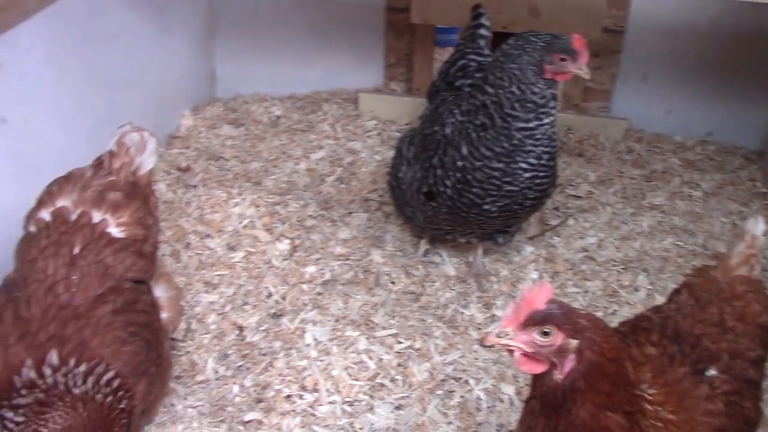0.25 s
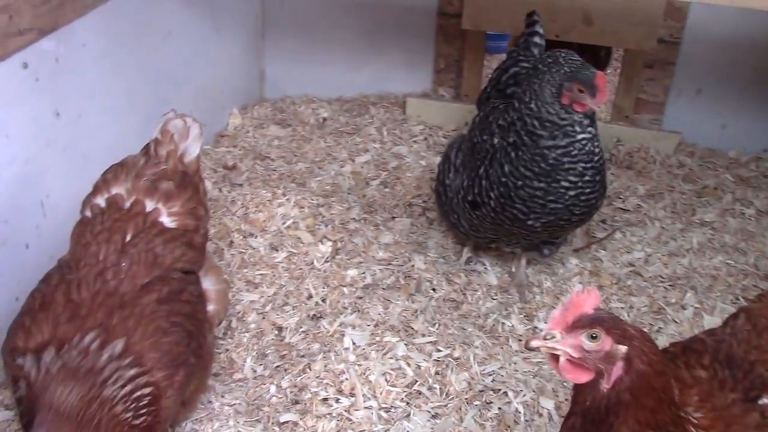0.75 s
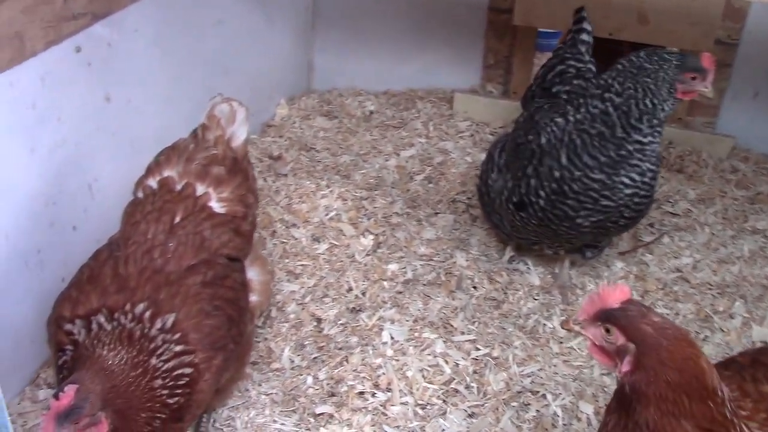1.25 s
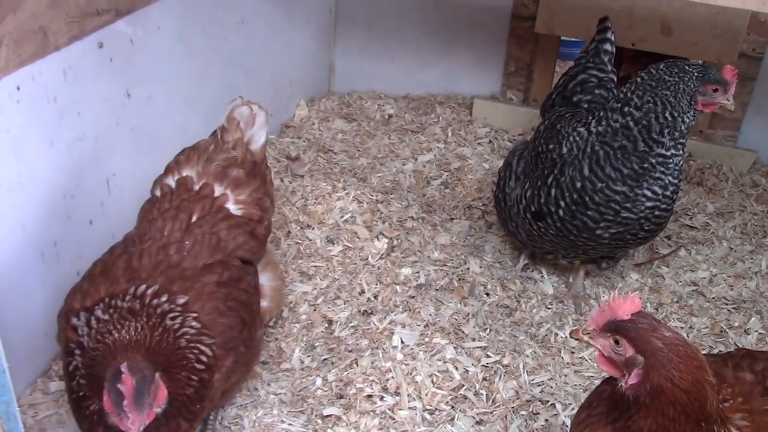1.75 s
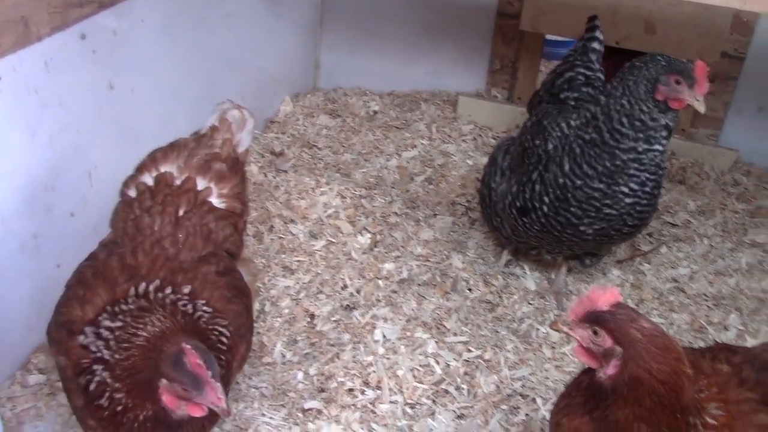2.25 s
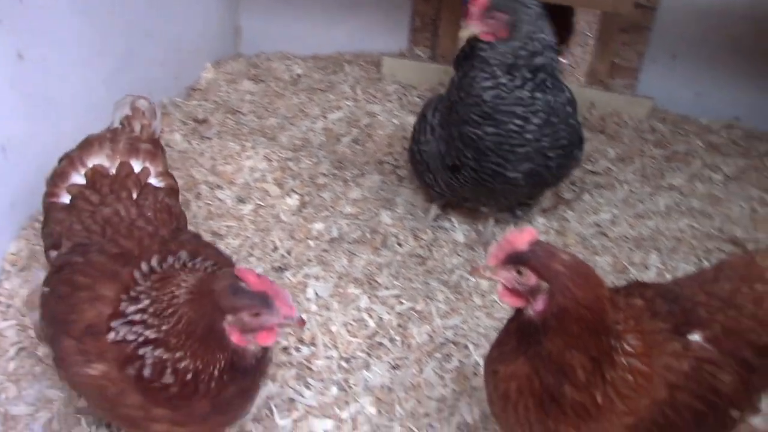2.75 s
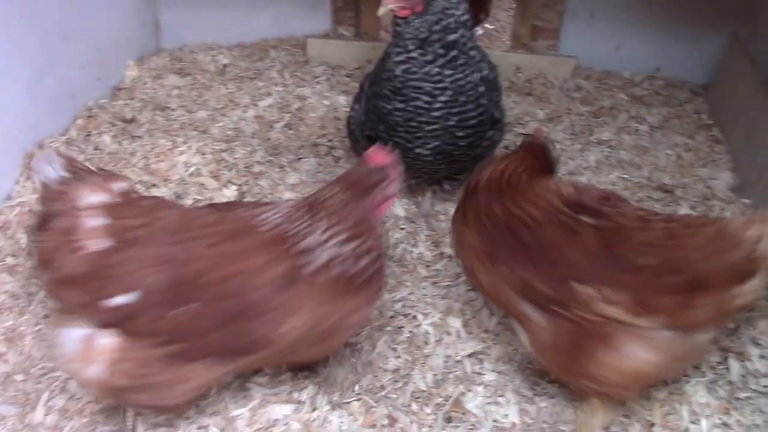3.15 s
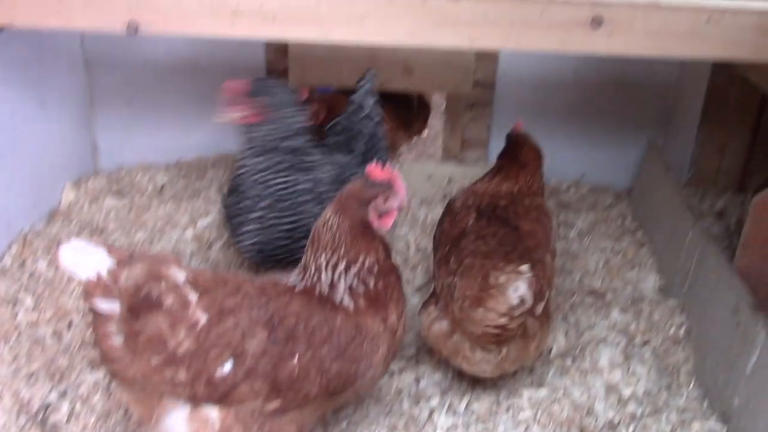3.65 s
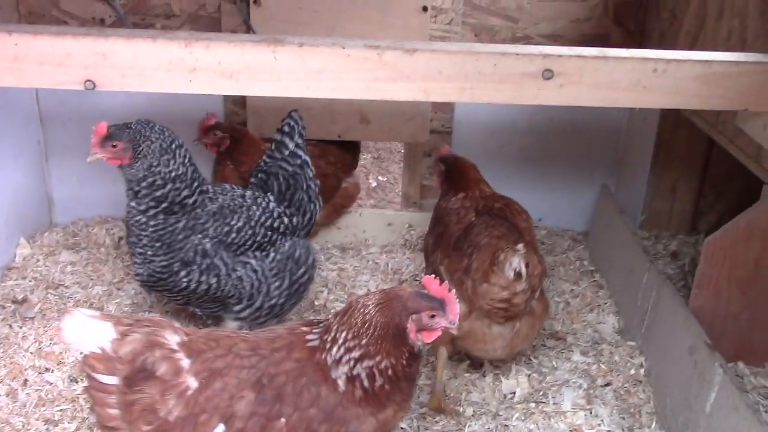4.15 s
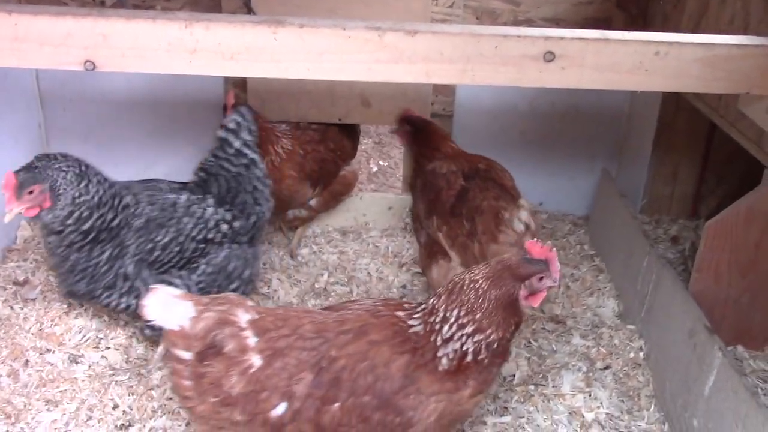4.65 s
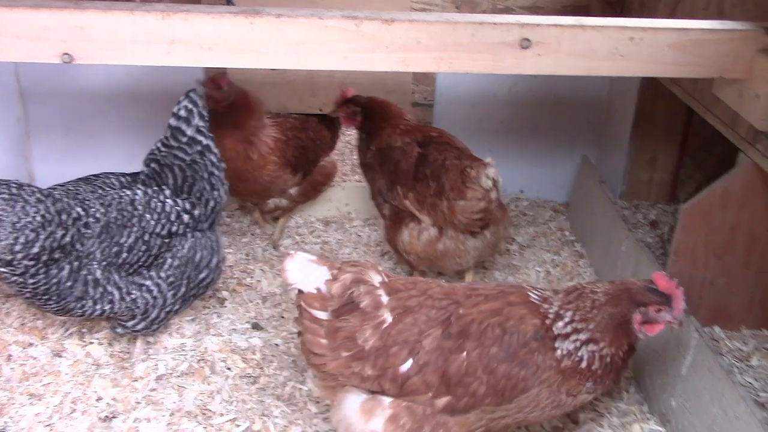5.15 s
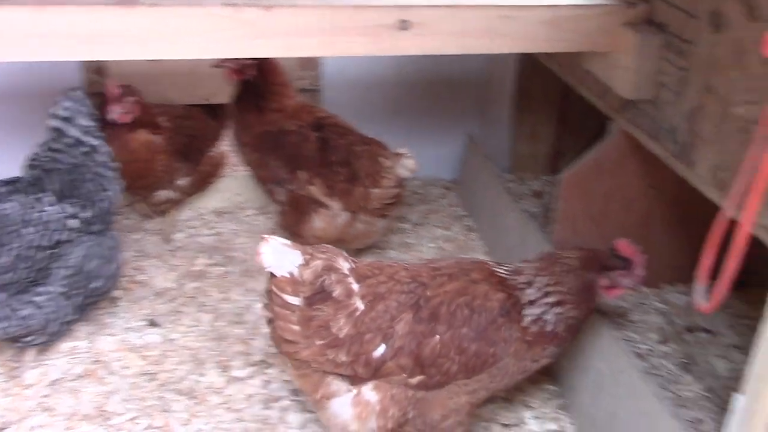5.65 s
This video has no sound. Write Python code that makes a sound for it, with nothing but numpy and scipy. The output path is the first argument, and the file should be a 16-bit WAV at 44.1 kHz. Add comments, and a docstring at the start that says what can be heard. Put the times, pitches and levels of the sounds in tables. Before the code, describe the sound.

Hens cluck in short rising runs, squawk harshly and give long clear calls while shuffling through wood shavings in a small coop.

```python
"""Hens in a wooden coop

Inside a small coop, stereo microphone close to the birds. One hen clucks in runs of short rising notes;
another answers with harsh squawks from an overblown syrinx, later with long, clear whistling notes.
Feet shuffle through wood shavings and knock the floor, beaks and claws tap on wood, feathers rustle.
The walls give a short ring over a low murmur of outdoor air."""
import sys
import numpy as np
from scipy import signal
from scipy.fft import rfft, irfft, next_fast_len
from scipy.io import wavfile
from scipy.ndimage import uniform_filter1d, map_coordinates

SR = 44100
rng = np.random.default_rng(int(sys.argv[2]) if len(sys.argv) > 2 else 0)


def transcribe(u):
    """Save the signal u as a 16-bit wav file named by the first command-line argument.

    u: samples, shape (n,) or (channels, n), limited to [-1, 1]; the rate is SR.
    q: integer samples, one column per channel.
    """
    v = np.clip(np.atleast_2d(u).T, -1, 1)
    q = np.round(v * 32767).astype(np.int16)
    wavfile.write(sys.argv[1], SR, q)


N = 260181
IMPACT_S = np.arange(SR // 5) / SR  # time axis of one knock, tap or snap


def amp(db):
    return 10 ** (np.asarray(db) / 20)


def unit_rms(x):
    return x / np.sqrt(np.mean(x ** 2) + 1e-20)


def along(points, hz):
    """Interpolate (freq_hz, value) points on a log frequency axis."""
    freqs, values = np.transpose(points)
    return np.interp(np.log(hz + 1), np.log(freqs + 1), values)


def stretch(rows, fade_s):
    """Sample span, soft-edged window and per-sample columns of rows that begin with a time."""
    times, *columns = np.transpose(rows)
    start, end_s = int(times[0] * SR), times[-1] + fade_s
    t = np.arange(start, min(N, int(end_s * SR))) / SR
    edge = np.clip(np.minimum(t - times[0], end_s - t) / fade_s, 0, 1)
    return slice(start, start + len(t)), edge, [np.interp(t, times, c) for c in columns]


def wobble(rate_hz):
    """A smooth random curve with rate_hz knots a second."""
    return map_coordinates(rng.standard_normal(N // 20), [np.arange(N) * rate_hz / SR])


def filtered(x, response):
    """Pass x through a complex response of frequency."""
    size = next_fast_len(N + SR // 2)
    return irfft(rfft(x, size) * response(np.fft.rfftfreq(size, 1 / SR)), size)[..., :N]


def coloured(x, spectrum, tilt_db_per_octave=0):
    """Shape x by (freq_hz, level_db) points, tilted about 7 kHz."""
    return filtered(x, lambda f: amp(along(spectrum, f) + tilt_db_per_octave * np.log2(f / 7000 + .01)))


def resonance(f, hz, width_hz):
    """Response of two like band-pass resonators in series."""
    return (1j * f * width_hz / (hz * hz - f * f + 1j * f * width_hz)) ** 2


def impact(out, start_s, db, hz, t60_s, attack_s, relative_width, hold_s=0):
    """Add to out a puff of noise around one pitch that dies away after hold_s."""
    t = IMPACT_S
    response = resonance(np.fft.rfftfreq(len(t), 1 / SR), hz, relative_width * hz)
    puff = unit_rms(irfft(rfft(rng.standard_normal(len(t))) * response, len(t)))
    decay = amp(db - 60 * np.maximum(t - hold_s, 0) / t60_s)
    out[round(start_s * SR):][:len(t)] += decay * (1 - np.exp(-t / attack_s)) * puff


def outdoor_air():
    """A soft low murmur from outside, gently uneven, as mid and side."""
    # colour of the murmur: freq_hz, level_db
    spectrum = [(25, -49), (90, -20.5), (125, -10), (220, 0), (400, -5.5), (800, -8), (1300, -14),
                (2000, -22.5), (3000, -27.5), (6000, -34), (10000, -43), (15600, -68)]
    # its slow rise and fall: time_s, level_db
    levels = [(0, -57), (2, -58), (3, -55), (3.7, -55.5), (5.9, -55)]
    times, db = np.transpose(levels)
    murmur = coloured(rng.standard_normal((2, N)) * amp(wobble(7.4)), spectrum)
    return amp(np.interp(np.arange(N) / SR, times, db)) * murmur / np.std(murmur)


def syrinx(calls, jitter, shimmer_db, breath_db, rough, strain):
    """The syrinx swings with a few harmonics, unsteady and breathy, ragged where the pitch moves fast."""
    # air past the syrinx: freq_hz, level_db
    breath_spectrum = [(150, -42.5), (300, -7.5), (600, 0.5), (1000, -11), (1600, -9), (2200, -24.5),
                       (3200, -50), (5000, -73.5)]
    out, phase = np.zeros(N), np.zeros(N)
    drift, flutter, swells = wobble(90), wobble(350), [wobble(45) for _ in range(6)]
    breath = unit_rms(coloured(rng.standard_normal(N), breath_spectrum))
    for rows in calls:
        span, edge, (hz, *levels) = stretch(rows, fade_s=.0034)
        glide = np.abs(uniform_filter1d(np.gradient(np.log(hz)), size=600)) * SR  # log pitch a second
        step = 2 * np.pi * hz * (1 + jitter * drift[span]) / SR
        phase[span] = phase[span.start] + np.cumsum(step)  # a joined note carries on the swing
        ragged = 1 + np.clip(rough + strain * glide, 0, 1) * flutter[span]
        for k, db in enumerate(levels, 1):
            peak = np.sqrt(2) * amp(db + shimmer_db * swells[k - 1][span])
            out[span] += edge * ragged * peak * np.sin(k * phase[span])
        out[span] += edge * amp(np.maximum(levels[0], levels[1]) + breath_db) * breath[span]
    return out


def clucks():
    """Two runs of short notes from the syrinx, most ending on a rise."""
    # one list a cluck or part of one: time_s, pitch_hz, harmonic1_db to harmonic3_db
    calls = [
        [(0.082, 589, -35.5, -62, -85.5), (0.098, 532, -26, -39.5, -77), (0.114, 524, -25, -33, -66.5),
         (0.13, 647, -27, -34.5, -76.5)],
        [(0.13, 683, -17.5, -26, -67), (0.14, 758, -27, -47, -60), (0.152, 913, -31.5, -49, -92),
         (0.168, 969, -32, -63, -96)],
        [(0.297, 558, -34.5, -64.5, -84.5), (0.317, 530, -25.5, -42, -61), (0.325, 601, -25.5, -56.5, -79),
         (0.33, 649, -31, -26.5, -48)],
        [(0.33, 605, -41, -40, -53), (0.34, 671, -19.5, -49, -64), (0.348, 836, -30.5, -42.5, -77),
         (0.356, 967, -37, -54, -91)],
        [(0.474, 660, -29.5, -63, -82), (0.48, 614, -34.5, -45, -83), (0.5, 541.5, -22.5, -31.5, -66),
         (0.52, 620, -29.5, -35, -50)],
        [(0.52, 599, -39, -36.5, -49), (0.526, 611, -29, -30.5, -44), (0.53, 629, -22, -32, -68),
         (0.554, 877, -34.5, -66, -89)],
        [(0.685, 625, -34, -75, -84), (0.695, 575.6, -33, -40.5, -58), (0.711, 539.6, -22, -48, -47),
         (0.725, 565, -23, -41, -43.5)],
        [(0.725, 562, -32, -30, -45.5), (0.753, 690, -21.5, -43.5, -62), (0.763, 726, -37, -46, -92.5),
         (0.765, 724.2, -38, -52, -75)],
        [(0.905, 606, -42, -49, -59), (0.929, 571, -32, -33, -63), (0.941, 516, -24, -38, -47),
         (0.97, 579, -34.5, -47, -44)],
        [(1.28, 536, -53, -29, -45), (1.292, 545.3, -34, -31, -44), (1.304, 568.3, -34, -43, -51),
         (1.338, 586.6, -30, -41, -46), (1.37, 552.8, -34.5, -40, -28.5)],
        [(1.37, 555, -27, -38.5, -41), (1.408, 582, -34.5, -44, -42.5), (1.428, 540, -31, -39.5, -66),
         (1.45, 632.4, -25.5, -38, -64.5), (1.46, 563, -36, -43.5, -76)],
        [(1.46, 562, -26.5, -38, -63), (1.468, 549.7, -44, -36.5, -67), (1.538, 545.6, -33, -32.5, -59),
         (1.58, 589.4, -26.5, -41.5, -51), (1.6, 629, -23, -34, -52)],
        [(1.6, 647, -48, -34, -64), (1.608, 642, -34, -37, -57), (1.62, 691, -25.5, -41.5, -63),
         (1.662, 774, -17.5, -37, -63), (1.685, 845, -57, -30.5, -73)],
        [(1.79, 594, -55, -27, -58), (1.804, 613.5, -27, -60, -39), (1.822, 556, -26, -27, -35),
         (1.84, 584.3, -27, -44, -60), (1.87, 623, -50, -34.5, -67)],
        [(4.474, 584, -40.5, -72.5, -65), (4.49, 525, -29, -40, -71.5), (4.51, 539, -23, -46, -47),
         (4.52, 534, -27, -29.5, -53)],
        [(4.52, 530, -26.5, -41.5, -61), (4.538, 679, -34, -41, -73), (4.56, 760, -38, -56.5, -84)],
        [(4.664, 566, -34.5, -41.5, -77), (4.678, 543.3, -24.5, -49, -77), (4.702, 554.3, -22, -31.5, -68.5),
         (4.726, 772, -26, -34.5, -76.5), (4.74, 899, -22, -53, -75)],
        [(4.87, 648, -29.5, -47, -82), (4.88, 635, -36.5, -57, -81), (4.896, 596, -28.5, -33.5, -57.5),
         (4.91, 641, -31.5, -33, -66.5)],
        [(4.91, 629, -32, -34, -69.5), (4.934, 696, -23, -40.5, -85), (4.944, 735, -25.5, -45, -86.5),
         (4.955, 800, -28.5, -54, -85.5)],
        [(5.075, 628, -33.5, -59.5, -68), (5.089, 585, -31.5, -40, -63), (5.103, 567, -34, -34.5, -51),
         (5.115, 586, -27.5, -42, -48)],
        [(5.115, 606, -27.5, -42, -54), (5.125, 637, -31, -30, -64), (5.149, 670, -33.5, -44.5, -87.5),
         (5.16, 698, -35, -46, -77)],
        [(5.282, 580, -55, -53, -70), (5.29, 625.5, -41, -31, -55), (5.314, 662, -32.5, -39.5, -46.5),
         (5.332, 662, -42, -31, -76), (5.36, 640, -57.5, -59, -71)],
    ]
    return syrinx(calls, jitter=.012, shimmer_db=1.5, breath_db=-25, rough=.06, strain=.015)


def hoarse_notes():
    """A ragged swing of the syrinx leads into the first squawk and carries it."""
    # one list a note or part of one: time_s, pitch_hz, harmonic1_db to harmonic3_db
    calls = [
        [(0.66, 742, -59, -75, -89), (0.68, 751, -38.5, -67, -100), (0.72, 864, -36.5, -50, -87),
         (0.754, 774, -38, -53, -88), (0.8, 881, -41, -39.5, -92)],
        [(0.8, 900, -48.5, -59, -91), (0.82, 947, -32, -56, -83), (0.848, 892, -39.5, -55, -88),
         (0.864, 837, -37, -41, -100), (0.9, 817, -42, -46, -81.5)],
        [(0.97, 480, -43, -54, -38.5), (0.988, 476.2, -35.5, -32, -44), (1.004, 467.7, -45, -37, -53),
         (1.016, 474, -43, -37, -48), (1.106, 459.8, -40, -42, -37.5), (1.186, 451.5, -54, -36.5, -44),
         (1.242, 448, -49, -42, -38), (1.26, 486, -27.5, -28, -43)],
    ]
    return syrinx(calls, jitter=.027, shimmer_db=-1, breath_db=-23, rough=.25, strain=.055)


def tract(drive, modes, scale):
    """Ring resonances of alternating polarity, their frequencies multiplied by scale."""
    return filtered(drive, lambda f: sum((-1) ** k * amp(db) * resonance(f, hz * scale, width_hz)
                                         for k, (hz, width_hz, db) in enumerate(modes)))


def squawks():
    """The syrinx is overblown: uneven pulses and turbulent air ring the throat and the beak."""
    # one list a squawk: time_s, level_db, rasp_db, pulse_rate_hz, noise_share
    calls = [
        [(0.8, -41, -43.5, 230.3, 0.58), (0.808, -43, -31, 234.1, 0.58), (0.826, -52, -27.5, 231.1, 0.58),
         (0.844, -44.5, -41, 232.6, 0.58), (0.948, -29, -37, 233, 0.58), (0.958, -32, -32, 232.6, 0.58),
         (1.136, -35, -25, 233.9, 0.58), (1.284, -29.5, -32.5, 233, 0.58), (1.33, -28, -27, 233, 0.58),
         (1.378, -26, -36, 229, 0.58), (1.402, -28.5, -29, 236.5, 0.58), (1.41, -30, -41, 233, 0.58),
         (1.45, -53, -42, 229, 0.58)],
        [(1.54, -35.5, -43, 233.9, 0.58), (1.828, -27, -29, 231.3, 0.58), (1.852, -36, -31, 231, 0.58),
         (1.86, -30, -45, 228.3, 0.58), (1.89, -74, -29, 234.5, 0.58)],
    ]
    # resonances of the open throat: freq_hz, width_hz, level_db
    throat_modes = [(468, 350, -14), (802, 188, -6.5), (1008, 98, -2.5), (1124, 170, -5), (1398, 476, -5.5),
                    (1583, 440, -7.5), (2083, 205, -20)]
    # resonances of beak and mouth: freq_hz, width_hz, level_db
    beak_modes = [(3695, 270, 6.5), (4290, 290, -9), (5660, 500, -20.5), (6760, 890, -26.5),
                  (8500, 580, -17.5), (10220, 500, -19.5)]
    # resonance scale of each squawk; the second comes from a shorter throat
    scales = [1, 1.058]
    out = np.zeros(N)
    for rows, scale in zip(calls, scales):
        drift, sizes, gusts, noise = wobble(40), wobble(120), wobble(150), rng.standard_normal(N)
        span, edge, (db, rasp_db, hz, noise_share) = stretch(rows, fade_s=.013)
        cycles = np.cumsum(hz * (1 + .035 * drift[span])) / SR
        pulses = np.diff(np.floor(cycles), prepend=0) * np.sqrt(SR / hz) * amp(1.5 * sizes[span])
        turbulence = noise[span] * amp(2.2 * gusts[span])
        drive = np.zeros(N)
        drive[span] = np.sqrt(1 - noise_share) * pulses + np.sqrt(noise_share) * turbulence
        body = unit_rms(tract(drive, throat_modes, scale)[span])
        rasp = unit_rms(tract(drive, beak_modes, scale)[span])
        out[span] += edge * amp(db) * (body + amp(rasp_db) * rasp)
    return out


def shuffle():
    """Shavings slide underfoot as a patchy hiss with small crackles."""
    # one list a movement: time_s, level_db, brightness (under 0 dull, over 0 bright)
    movements = [
        [(0.95, -81, 0), (0.974, -75, 0.5), (0.982, -66.5, 7), (1.064, -86, -7), (1.136, -75, 0),
         (1.148, -62.5, 1), (1.232, -54.5, 1), (1.258, -62, 0), (1.314, -46.5, 0), (1.44, -70, 0),
         (1.45, -74, 1)],
        [(2.25, -90, 0), (2.282, -59, 0), (2.3, -72.5, 0), (2.348, -62.5, 1), (2.436, -79, 0), (2.454, -58, 1),
         (2.52, -80, 1)],
        [(2.52, -70, 1), (2.538, -46.5, 1), (2.59, -55, 1), (2.602, -57, 1), (2.622, -60.5, 1),
         (2.672, -50.5, 1), (2.768, -44.5, 0), (2.846, -57.5, 1), (2.9, -56, 1)],
        [(2.9, -53, 1), (2.926, -42, 1), (2.97, -50, 1), (3.072, -36.5, 1), (3.186, -50, 1), (3.234, -50, 1),
         (3.294, -63.5, 0), (3.3, -59, 1)],
        [(3.3, -57.5, 1), (3.344, -45.5, 1), (3.384, -57, 1), (3.396, -54, 1), (3.408, -41.5, 1),
         (3.488, -63.5, 0), (3.55, -70, 0)],
        [(3.55, -75, 0), (3.582, -60, 0), (3.6, -69, 0), (3.622, -58, 1), (3.698, -62.5, 0), (3.748, -56, 1),
         (3.938, -65, 0), (3.984, -68, 1), (3.994, -53.5, 0), (4.008, -64.5, 0), (4.112, -63, 0),
         (4.12, -66.5, 0), (4.2, -66.5, 1)],
        [(4.2, -64.5, 0), (4.264, -61.5, 1), (4.268, -61, 1), (4.294, -46.5, 1), (4.342, -60, 1),
         (4.43, -67, 0), (4.45, -65.5, 0)],
        [(4.45, -68, 1), (4.47, -69, 0), (4.534, -63.5, 0), (4.568, -68, 0), (4.598, -64, 0), (4.64, -67, 0),
         (4.69, -60.5, 1), (4.74, -61, 0.0058), (4.748, -60.5, 0), (4.778, -65, -2), (4.94, -70, -1.5),
         (4.964, -67, 1), (5.002, -70, 0), (5.244, -75, 1), (5.25, -67, 1)],
        [(5.535, -57, 1), (5.543, -60, 0), (5.593, -54.5, 0), (5.6, -66, 0)],
        [(5.6, -68.5, 0), (5.666, -71.5, 0), (5.678, -60.5, 1), (5.69, -73.5, 1), (5.72, -54, 1),
         (5.762, -65, 0), (5.882, -64.5, 0), (5.9, -77, 0)],
    ]
    # colour of sliding shavings: freq_hz, level_db
    spectrum = [(530, -38.5), (900, -6), (1030, -20.5), (1690, -3.5), (2310, -2.5), (3340, 1), (4240, -3),
                (5200, -1), (7980, -1), (13000, -13.5), (15600, -17.5)]
    crackle = (rng.random(N) < .02) * rng.standard_normal(N) * rng.standard_normal(N)
    frames = signal.stft(rng.standard_normal(N) + .49 * unit_rms(crackle), nperseg=256)[2]
    patches = uniform_filter1d(rng.standard_normal(frames.shape), size=8, axis=0)  # across frequency
    patches = uniform_filter1d(patches, size=6, axis=1)  # across time
    grains = signal.istft(frames * amp(2.9 * unit_rms(patches)), nperseg=256)[1][:N]
    grains *= amp(.88 * wobble(45) + .67 * wobble(160))
    dull, bright = (unit_rms(coloured(grains, spectrum, tilt)) for tilt in (-4, 4))
    out = np.zeros(N)
    for rows in movements:
        span, edge, (db, brightness) = stretch(rows, fade_s=.004)
        share = .5 + .5 * np.tanh(brightness / 3.5)
        out[span] += edge * amp(db) * ((1 - share) * dull[span] + share * bright[span])
    return out


def foot_knocks():
    """A foot presses a floorboard, which thuds broadly."""
    # footfalls: start_s, level_db, pitch_hz, contact_s, t60_s
    knocks = [(1.271, -53.5, 100, .015, 0.034), (1.272, -40, 223, 0.018, 0.056),
              (1.523, -38, 495, 0.025, .04), (2.287, -58, 310, 0.027, .08), (2.997, -35, 564, 0.016, 0.076),
              (3.577, -37.5, 310, 0.019, 0.063), (3.609, -55, 278, 0.012, 0.064),
              (4.303, -53.5, 258, 0.018, 0.064)]
    out = np.zeros(N + SR)
    for start_s, db, hz, contact_s, t60_s in knocks:
        impact(out, start_s, db, hz, t60_s, attack_s=.0014, relative_width=.6, hold_s=contact_s)
    return out[:N]


def beak_taps():
    """A beak or claw strikes wood, which rings briefly in a narrow band."""
    # strikes: start_s, level_db, pitch_hz, t60_s
    taps = [(1.308, -34, 2980, .04), (2.277, -55, 2650, 0.088), (2.279, -57, 3830, .05),
            (2.71, -48, 2160, .08), (2.925, -42.5, 2560, .07), (3.047, -45, 2740, .1),
            (4.118, -50, 2760, 0.088), (4.12, -52, 4600, 0.046), (4.578, -54.5, 2010, 0.13),
            (5.529, -35.5, 2360, .02), (5.543, -32.5, 2860, .025), (5.566, -36.5, 3100, .025)]
    out = np.zeros(N + SR)
    for start_s, db, hz, t60_s in taps:
        impact(out, start_s, db, hz, t60_s, attack_s=.0015, relative_width=.23)
    return out[:N]


def chip_snaps():
    """A single wood chip cracks as a very short puff around its own pitch."""
    # cracks: start_s, level_db, pitch_hz
    snaps = [(1.8144, -51, 11140), (2.4583, -51, 5270), (2.4957, -41, 8100), (2.5346, -36.5, 7870),
             (2.599, -36.5, 11100), (2.6628, -37, 6860), (2.8265, -36, 5400), (2.9083, -33.5, 6600),
             (3.0046, -32.5, 7500), (3.4072, -32.5, 8900), (3.5804, -50, 7130), (3.9936, -40, 6100),
             (4.2697, -34, 6240), (5.5084, -32.5, 6520), (5.5304, -43.5, 6760), (5.5433, -38, 7050),
             (5.5584, -40, 8470), (5.5662, -38.5, 5970), (5.5904, -43.5, 8500), (5.6376, -52, 7400),
             (5.6765, -54.5, 4460), (5.8487, -55, 7180), (5.874, -52, 10160)]
    out = np.zeros(N + SR)
    for start_s, db, hz in snaps:
        impact(out, start_s, db, hz, t60_s=.009, attack_s=.0008, relative_width=.45)
    return out[:N]


def alarm_cluck():
    """One low, breathy cluck from the syrinx, rich in overtones."""
    # its two halves: time_s, pitch_hz, harmonic1_db to harmonic6_db
    calls = [
        [(4.283, 391, -47, -32.5, -67, -50, -69, -71), (4.293, 414, -45, -26.5, -34.5, -36, -75, -65),
         (4.303, 387.6, -38.5, -32, -48, -54, -47, -69), (4.315, 409, -31.5, -29.5, -35, -53, -54, -76)],
        [(4.315, 391, -45, -41, -34, -48, -50, -71), (4.323, 393.7, -47, -27.5, -38, -62, -65, -77),
         (4.331, 406.5, -55, -34, -37, -65, -65, -94), (4.35, 392, -55.5, -54, -55, -77, -95, -76)],
    ]
    return syrinx(calls, jitter=.017, shimmer_db=.5, breath_db=-19, rough=.081, strain=.025)


def long_notes():
    """The syrinx swings almost as a sine in long, clear whistles."""
    # one list a note or part of one: time_s, pitch_hz, harmonic1_db to harmonic3_db
    calls = [
        [(4.72, 765.4, -38.5, -47.5, -99.5), (4.74, 856, -23.5, -50, -75), (4.778, 793.5, -25, -50.5, -91),
         (4.84, 704.7, -24.5, -34.5, -74.5), (4.862, 687.3, -15.5, -46.5, -81), (4.9, 721.5, -31, -45.5, -78)],
        [(4.9, 727, -22.5, -43, -72.5), (4.944, 742, -29.5, -47.5, -88), (4.954, 757, -29, -55.5, -82),
         (4.968, 731.5, -23, -45.5, -86), (5.024, 743, -23, -50.5, -79.5), (5.08, 755.5, -23, -58.5, -84)],
        [(5.08, 741, -27.5, -63.5, -81), (5.116, 774, -28, -49, -72), (5.148, 758, -22.5, -54, -84),
         (5.212, 780, -21, -57, -86.5), (5.248, 835.5, -19, -39, -90), (5.285, 831, -30.5, -67.5, -75)],
        [(5.375, 664.7, -43.5, -50, -77), (5.401, 716, -24.5, -39, -69), (5.429, 840, -25, -48, -82.5),
         (5.449, 812, -21, -43.5, -64), (5.5, 802, -20.5, -47.5, -61)],
        [(5.5, 784, -22, -48.5, -70), (5.526, 794.6, -20, -46.5, -57), (5.56, 794, -20, -57.5, -65.5),
         (5.596, 795, -25, -54, -61), (5.622, 773.5, -24.5, -60, -63.5), (5.66, 788, -30, -51, -65)],
        [(5.66, 809, -21.5, -56.5, -73), (5.72, 797, -17, -53, -60), (5.754, 816, -17.5, -54, -70.5),
         (5.768, 817.4, -21, -48, -62), (5.794, 824, -21.5, -63.5, -72), (5.82, 854, -46, -73, -65)],
    ]
    return syrinx(calls, jitter=.011, shimmer_db=1, breath_db=-34, rough=.058, strain=.03)


def ruffle():
    """A thin, grainy hiss, as of ruffled feathers."""
    # one list a rustle: time_s, level_db
    rustles = [
        [(5.25, -60.5), (5.26, -54.5), (5.47, -52), (5.502, -54.5), (5.508, -49.5), (5.524, -65.5),
         (5.566, -54.5), (5.6, -65)],
    ]
    # colour of the feathers: freq_hz, level_db
    spectrum = [(1530, -33.5), (2600, -1), (2980, -4.5), (4880, -16.5), (6630, 3), (8490, -5.5),
                (9430, -11.5), (10200, -11), (15600, -28)]
    grains = rng.standard_normal(N) * amp(1.1 * wobble(30) + 1.1 * wobble(120) + 2.1 * wobble(600))
    hiss = unit_rms(coloured(grains, spectrum))
    out = np.zeros(N)
    for rows in rustles:
        span, edge, (db,) = stretch(rows, fade_s=.004)
        out[span] = edge * amp(db) * hiss[span]
    return out


def walls(direct):
    """The coop's short ring as mid and side, each frequency dying at its own speed."""
    # decay between the walls: freq_hz, t60_s
    ring_times = [(200, .17), (800, 0.13), (2500, 0.11), (10000, 0.039)]
    hz, t, frames = signal.stft(rng.standard_normal((2, SR // 3)), SR, nperseg=256)
    decay = amp(-60 * t / along(ring_times, hz)[:, None])
    tail = signal.istft(frames * decay, SR, nperseg=256)[1]
    delayed = np.pad(direct, (130, 0))  # about 3 ms
    return signal.fftconvolve(delayed[None], tail / np.linalg.norm(tail[0]), axes=1)[:, :N]


def scene():
    """Hens close and near the centre, leaning slightly left; the ring and the air add a little width."""
    # gain of the side channel: freq_hz, gain_db
    side_gains = [(30, -15), (70, -25), (240, -21), (700, -20.5), (1500, -19), (3800, -17), (8000, -18.5),
                  (15000, -18)]
    voices = clucks() + alarm_cluck() + long_notes() + hoarse_notes() + squawks()
    movement = shuffle() + ruffle() + chip_snaps() + beak_taps() + foot_knocks()
    direct = voices + movement
    ring_mid, ring_side = walls(direct)
    air_mid, air_side = outdoor_air()
    damped_ring = filtered(ring_mid, lambda f: 1 / (1 + (f / 4000) ** 2))  # bedding swallows the treble
    mid = direct + amp(-6.5) * damped_ring + air_mid
    side = coloured(amp(-6) * ring_side + amp(3) * air_side, side_gains)
    lean = filtered(mid, lambda f: .05 / (1 + (f / 1200) ** 2))
    return np.array([mid + side + lean, mid - side - lean])


def record(dry):
    """A small camera microphone drops the deep bass; nothing passes above the camera's band limit."""
    low_cut_hz, top_hz = 70, 15725
    return filtered(dry, lambda hz: (hz < top_hz) * hz ** 2 / (hz ** 2 + low_cut_hz ** 2))


dry = scene()
out = record(dry)
transcribe(out)
```